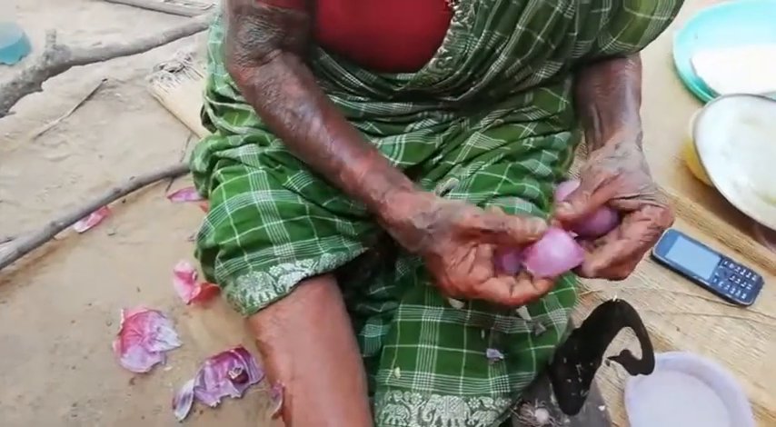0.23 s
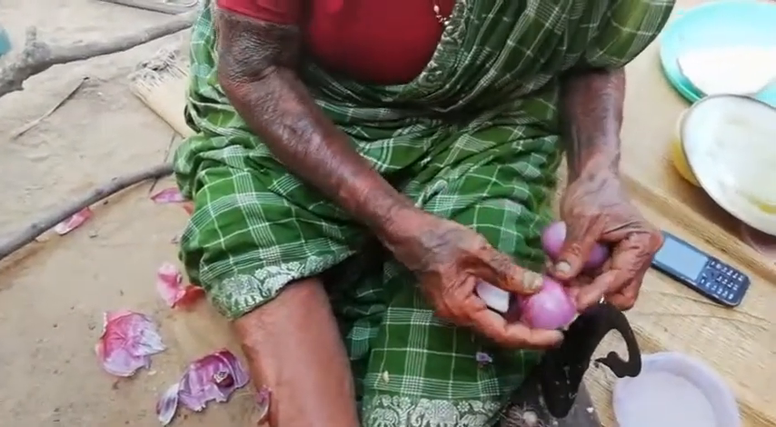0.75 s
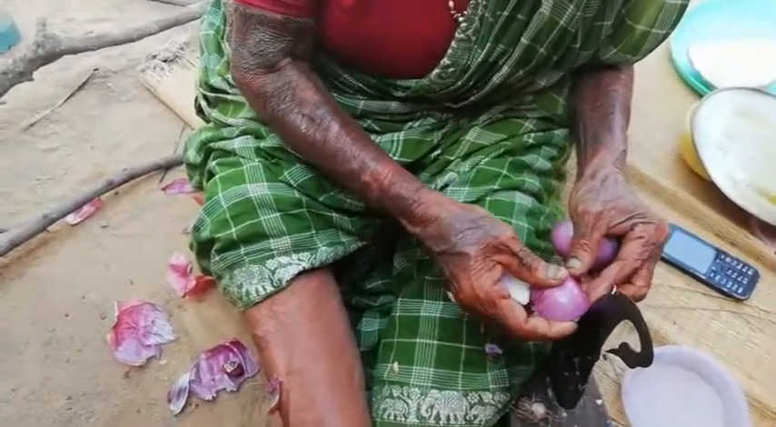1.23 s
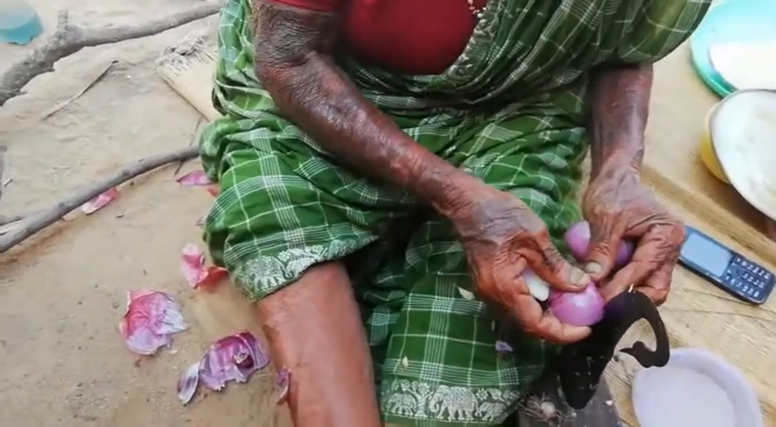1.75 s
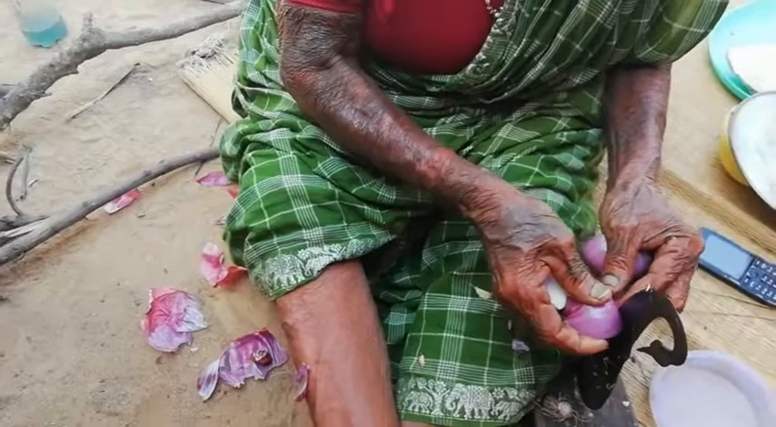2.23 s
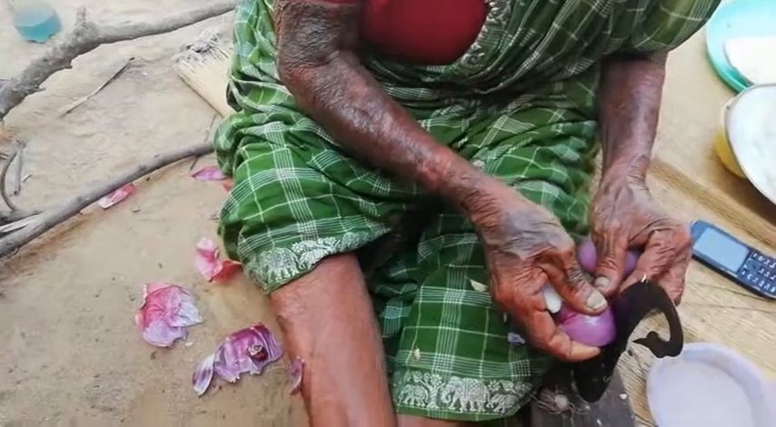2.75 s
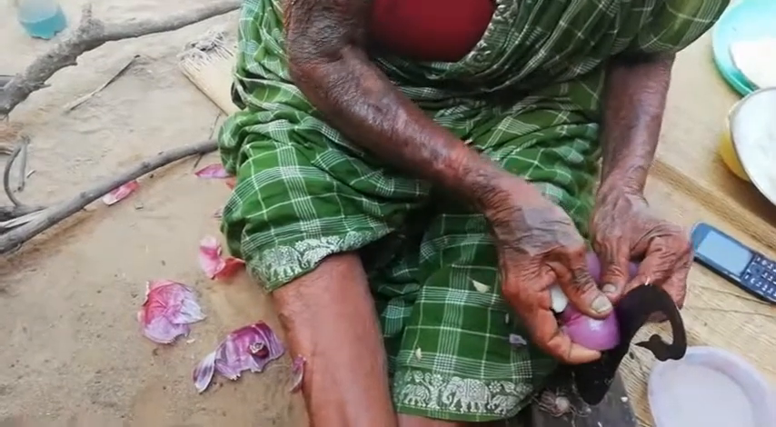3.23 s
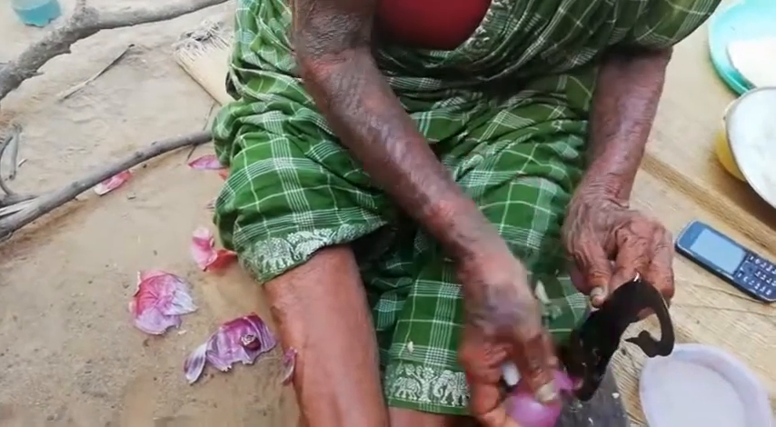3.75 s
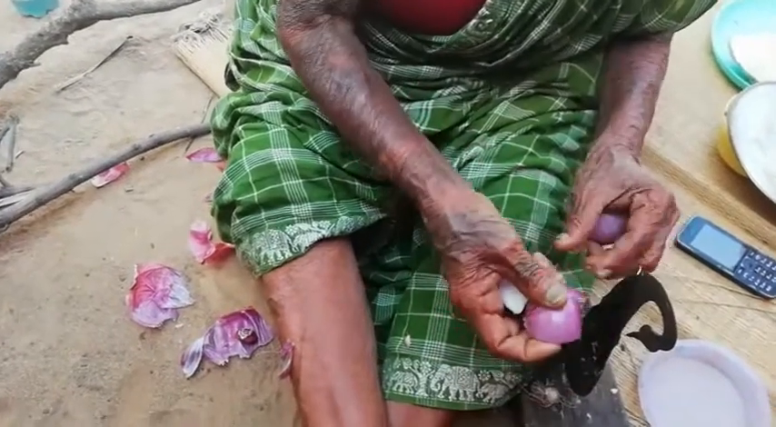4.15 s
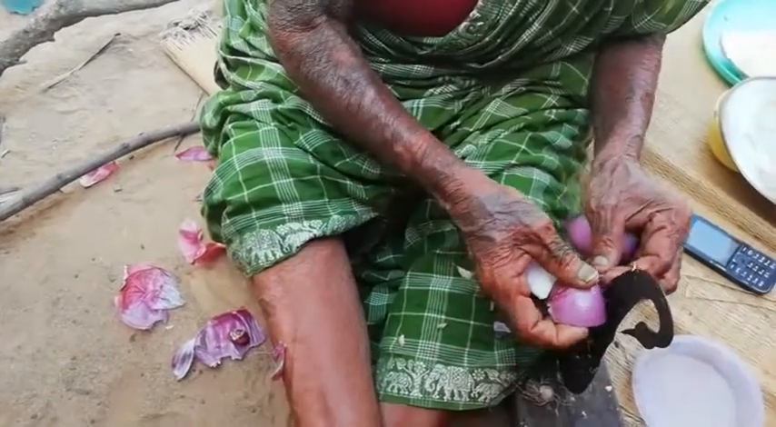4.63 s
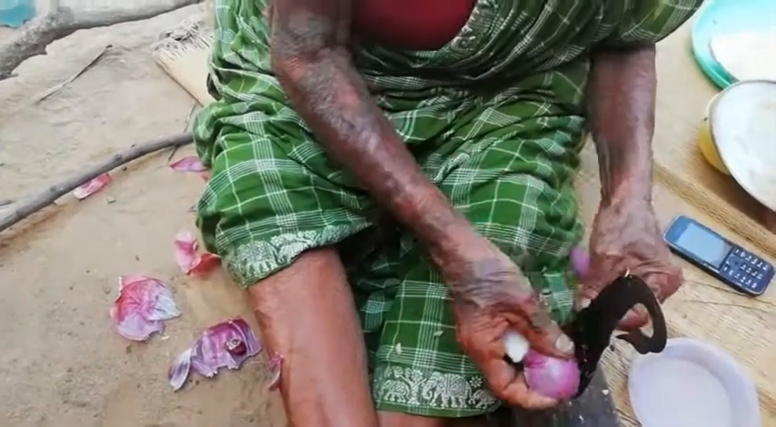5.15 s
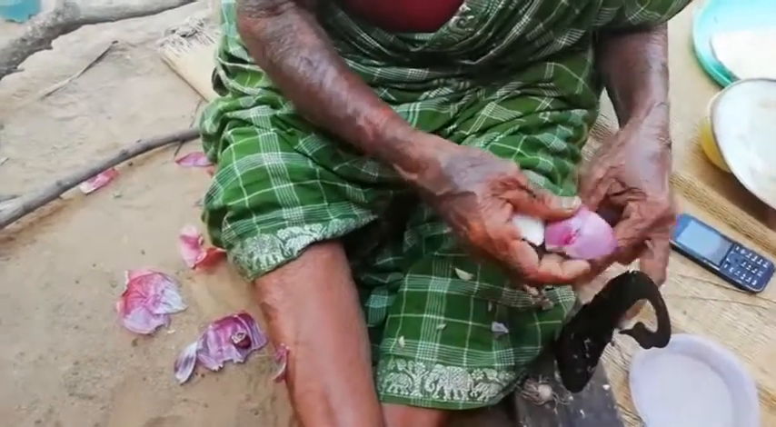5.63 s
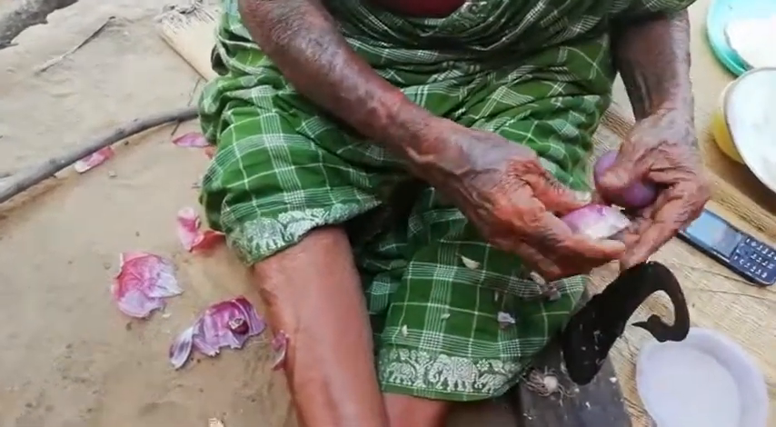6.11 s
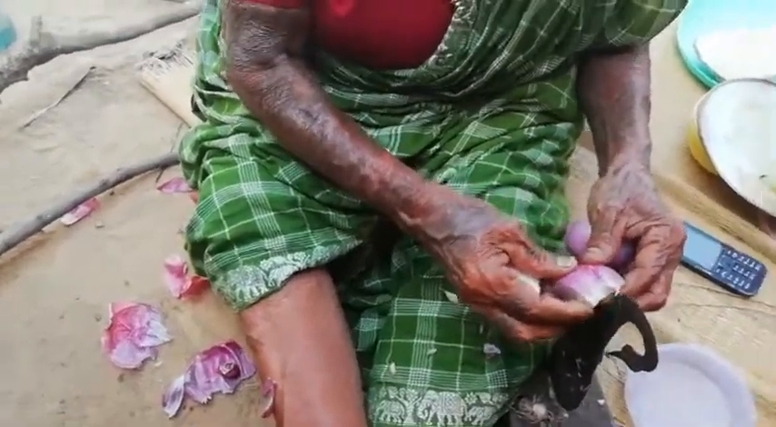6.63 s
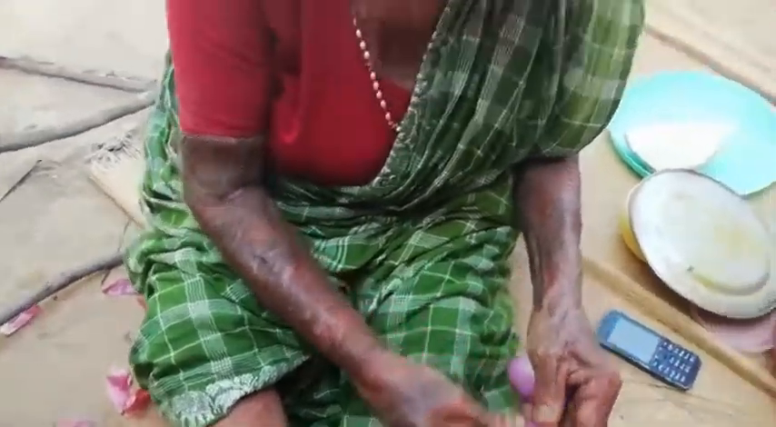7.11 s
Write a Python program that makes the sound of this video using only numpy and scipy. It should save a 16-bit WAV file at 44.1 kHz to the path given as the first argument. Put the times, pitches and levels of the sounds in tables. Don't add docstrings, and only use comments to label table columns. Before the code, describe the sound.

An open rural yard, with soft air hiss and a faint low engine throb from the start. At about 0.9 seconds a hen gives a long, nasal cry, strongest near 1.2, falling and fading by 1.7. A chick peeps thinly at 1.7 and 2.0, and small birds swoop downward around 2.0 to 2.4. Far whistles repeat between 2.4 and 3.8. The hen clucks at 2.5, murmurs, clucks more clearly at 3.3, then softly at 4.2, with a groan and coo near 4.7. More peeps come at 4.1, 4.5, 5.0 and faintly 6.3. Close by, dry onion skins rustle, with sharp snaps at 2.3, 3.4 to 3.5 and 5.6. Two dull handling bumps fall at 2.3 and 2.7. Leaves stir gently; another distant engine swells around 5. The loudest papery crackling and snapping comes from 7.0 to 7.3.

```python
import sys
import numpy as np
from scipy import signal
from scipy.fft import rfft, irfft
from scipy.io import wavfile
from scipy.ndimage import uniform_filter1d

SR = 44100
rng = np.random.default_rng(int(sys.argv[2]) if len(sys.argv) > 2 else 0)


def gain_from_decibels(decibels):
    exponent = np.asarray(decibels, float) / 20
    return 10 ** exponent


def pcm_store(signal):
    levels = np.round(np.clip(np.atleast_2d(signal), -1, 1) * 32767)
    wavfile.write(sys.argv[1], SR, levels.astype(np.int16).T)


N = 325017


def shape(points, hz):
    p = np.array(points)
    return gain_from_decibels(np.interp(np.log(hz + 1), np.log(p[:, 0] + 1), p[:, 1]))


def coloured(x, points):
    y = irfft(rfft(x) * shape(points, np.fft.rfftfreq(N, 1 / SR)), N)
    return y / np.std(y)


def band(x, order, hz, kind="low"):
    return signal.sosfilt(signal.butter(order, hz, kind, fs=SR, output="sos"), x)


def drift(rate):
    width = max(int(SR / 80 / rate), 1)
    slow = uniform_filter1d(uniform_filter1d(rng.standard_normal(N // 40), width), width)
    return np.interp(np.arange(N) / 40, np.arange(len(slow)), slow / np.std(slow))


def span(rows):
    s, *columns = np.transpose(rows)
    at = np.arange(round(s[0] * SR), min(round(s[-1] * SR), N))
    ends = np.clip(np.minimum(at - at[0], at[-1] - at) / (0.0035 * SR), 0, 1)
    return at, ends, [np.interp(at / SR, s, c) for c in columns]


def tones(tables, overtones, flutter_db, flutter_rate, colour=((1, 0), (20000, 0))):
    out = np.zeros(N)
    for k, k_db in overtones:
        flutter = gain_from_decibels(flutter_db * drift(flutter_rate))
        start = rng.uniform(0, 2 * np.pi)
        for rows in tables:
            at, ends, (pitch, level_db) = span(rows)
            phase = 2 * np.pi * k * np.cumsum(pitch) / SR
            gain = gain_from_decibels(level_db + k_db) * shape(colour, k * pitch) * flutter[at]
            out[at] += np.sqrt(2) * ends * gain * np.sin(phase + start)
    return out


def throat(modes, hz):
    return sum(gain_from_decibels(level_db) / (1 + (2 * (hz - centre_hz) / width_hz) ** 2)
               for centre_hz, width_hz, level_db in modes)


def voice(pitch, rough, gain_at):
    n = len(pitch)
    phase = 2 * np.pi * np.cumsum(pitch * (1 + 0.043 * rough * drift(150)[:n])) / SR
    orders = np.arange(1, 30)[:, None]
    wander = drift(9)[(np.arange(n) + 9973 * orders) % N]
    gains = gain_at(orders * pitch) * gain_from_decibels(4.5 * wander * np.minimum(orders / 8, 1))
    shimmer = np.array([drift(120)[:n] for _ in range(3)])[orders[:, 0] % 3]
    rough = np.minimum(rough * (1 + (orders / 11) ** 2), np.maximum(rough, .45))
    breakup = 1 - rough + 2.6 * rough * shimmer
    lines = gains * breakup * np.sin(orders * phase + orders ** 2 * 0.223)
    return lines.sum(0) / np.sqrt(.5 * np.sum(gains ** 2, 0))


# start_s, pitch_hz, level_db, beak opening [0-1], main resonance [share of rest]
CALL = [
    (.92, 495, -57, 0.44, 0.93),
    (.965, 413.4, -47, 0.54, 0.94),
    (1.06, 440.7, -32.5, 1, 0.83),
    (1.14, 429, -34.5, 1, 0.92),
    (1.185, 404.7, -28.5, 0.98, 1.15),
    (1.3, 363, -32, 0.7, 1.01),
    (1.37, 352, -40.5, 0.51, 0.926),
    (1.445, 360, -44.5, 0.26, 0.71),
    (1.72, 304, -63.5, 0.33, 0.68),
]
# centre_hz, width_hz, level_db
OPEN_THROAT = [(850, 160, -7), (1500, 310, 2.5), (2560, 1050, -7.5), (3240, 210, -1), (4960, 920, -9),
               (6300, 1600, -14), (8200, 610, -52)]
# centre_hz, width_hz, level_db
CLOSED_THROAT = [(706, 690, -6), (1020, 63, -13), (1880, 660, -43)]


def long_call():
    out = np.zeros(N)
    at, ends, (pitch, level_db, beak, slide) = span(CALL)
    settle_s = .03
    since_s = (at - at[0]) / SR
    rough = .04 + .3 * np.exp(-((since_s - 2 * settle_s) / settle_s) ** 2 / 2)
    beak = np.clip(beak, 0, 1) ** 2
    low, (main_hz, *main), *high = OPEN_THROAT

    def mouth(hz):
        opened = throat([low, (main_hz * slide, *main)], hz) + beak * throat(high, hz)
        closed = 0.19 * (1 - beak) ** 2 * throat(CLOSED_THROAT, hz)
        chest_cut_hz = 437
        return (beak * opened + closed) / (1 + (chest_cut_hz / hz) ** 6)

    out[at] += ends * gain_from_decibels(level_db) * voice(pitch, rough, mouth)
    return out


def cluck(row, moves):
    s, length, pitch_hz, throat_hz, level_db = row
    start, soon, end, sag, width_hz, rough_share = moves
    attack_s = .014
    opened = min(.03, 0.91 * length)
    at, ends, (pitch, fall_db, opens) = span([(s - attack_s / 2, pitch_hz, -8, start),
                                              (s + attack_s, 1.02 * pitch_hz, 3, start),
                                              (s + attack_s + opened, pitch_hz, -1, soon),
                                              (s + length + attack_s, sag * pitch_hz, -7, end)])
    modes = [(throat_hz * opens, width_hz, 0), (2.09 * throat_hz, 500, -16), (3000, 900, -24)]
    rough = np.clip(rough_share * .036 * (-30 - level_db), 0, 1)
    return at, ends * gain_from_decibels(level_db + fall_db) * voice(pitch, rough, lambda hz: throat(modes, hz))


# start_s, length_s, pitch_hz, throat_hz, level_db
CLUCKS = [
    (2.526, 0.075, 252.5, 1060, -53),
    (3.282, 0.11, 253, 990, -41),
    (4.187, 0.12, 229.2, 850, -57.5),
    (5.064, 0.058, 268.4, 1450, -63),
    (5.336, 0.054, 239.5, 865, -72.5),
    (6.749, 0.033, 247, 900, -72.5),
    (1.663, 0.12, 262, 1420, -65),
]
# start_s, length_s, pitch_hz, throat_hz, level_db
GROANS = [
    (2.66, 0.13, 261.4, 1046, -50.5),
    (2.81, 0.047, 245, 764, -57),
    (4.68, 0.17, 259, 962, -54.5),
    (4.89, 0.1, 247, 1000, -64.5),
    (5.822, 0.062, 258.8, 810, -64.5),
    (6.055, 0.12, 249.3, 990, -62),
]
CLUCK_MOVES = (.74, 1., 1.0, .97, 300, .7)
GROAN_MOVES = (1., 1., .9, .92, 170, .6)
# start_s, pitch_hz, level_db
COO = [
    (4.59, 274, -65),
    (4.64, 274, -55),
    (4.7, 254.6, -52),
    (4.76, 264, -63),
]


def hen():
    out = tones([COO], [(1, 0.019)], 2.0, 30) + long_call()
    for rows, moves in ((CLUCKS, CLUCK_MOVES), (GROANS, GROAN_MOVES)):
        for row in rows:
            at, sound = cluck(row, moves)
            out[at] += sound
    return out


def peep(row, form):
    s, crest_hz, end_hz, length, level_db = row
    start_hz, lead, lead_db, drop, roundness = form
    t = np.linspace(-lead, length, num=60)
    early = np.clip(-t / lead, 0, 1)
    late = np.clip(t / min(drop, length), 0, 1)
    climb_hz = (crest_hz - start_hz) * early ** 2
    slide_hz = (crest_hz - end_hz) * (1 - (1 - late ** roundness) ** 2)
    fade_db = -5 * late ** 3 - 44 * np.clip(t - drop, 0, None)
    return np.c_[s + t, crest_hz - climb_hz - slide_hz, level_db + lead_db * early ** .4 + fade_db]


# hz, level_db
BEAK = [(1800, -7), (2550, -2.5), (3200, -1.5), (4800, -14.5), (5800, 1), (6800, 4.5), (7600, 3),
        (9000, -11)]
# crest_s, crest_hz, end_hz, length after crest_s, level_db
PEEPS = [
    (1.665, 3402, 2482, 0.12, -51.5),
    (2.033, 3270, 2513, 0.15, -53.5),
    (4.075, 3656, 2505, 0.15, -54.5),
    (4.496, 3367, 2550, 0.15, -55.5),
    (5.026, 3516, 1783, 0.062, -57),
    (6.331, 3630, 2100, 0.072, -63),
]
# start_hz, climb_s, start level_db, slide_s, crest roundness [exponent]
PEEP_SHAPES = [(3290, 0.033, -8.5, 0.077, 2.4), (3370, 0.046, -17, .065, 1.4), (3270, .045, -13, .078, 1.5),
               (3370, .04, -13, .075, 1.6), (3250, .045, 2.5, .045, 1.3), (3250, .057, -4.5, .062, 1.9)]
# multiple, level_db
PEEP_OVERTONES = [(1, 9.5), (2, -2), (3, -14)]


def chick():
    curves = [peep(row, form) for row, form in zip(PEEPS, PEEP_SHAPES)]
    return gain_from_decibels(9.0) * tones(curves, PEEP_OVERTONES, 4.5, 110, BEAK)


def whistle(s, length, hz, level_db, scoop_s):
    t = np.linspace(0, length, num=40)
    swell_db = -12 * np.clip(1 - t / .014, 0, 1) - 8 * t
    return np.c_[s + t, hz * (1 - .14 * np.exp(-t / scoop_s)), level_db + swell_db]


# start_s, length_s, held pitch_hz, level_db, scoop_s
WHISTLES = [
    (2.44, 0.16, 1530, -59.5, 0.039),
    (2.8, 0.212, 1535, -62, .045),
    (3.225, 0.154, 1508, -56.5, 0.056),
    (3.62, 0.17, 1505, -60.5, .06),
    (1.4, .09, 1300, -73, 0.00421),
]
# multiple, level_db
WHISTLE_OVERTONES = [(1, 0), (2, 2.5), (3, 6.5), (4, 7)]


def whistling_bird():
    return gain_from_decibels(2.5) * tones([whistle(*row) for row in WHISTLES], WHISTLE_OVERTONES, 3.5, 21)


def swoop(s, length, start_hz, end_hz, level_db):
    u = np.linspace(0, 1, num=40)
    pitch = end_hz + (start_hz - end_hz) * (1 - u) ** 2.2
    return np.c_[s + length * u, pitch, level_db + np.interp(u, [0, 0.24, 1], [-10, 0, -10])]


# start_s, length_s, start_hz, end_hz, level_db
SWOOPS = [
    (1.983, 0.046, 4500, 2700, -49.5),
    (4.17, 0.18, 5300, 4620, -57.5),
    (2.287, 0.087, 4800, 2600, -50),
    (2.037, 0.0403, 2650, 2000, -60),
    (2.36, 0.061, 2600, 2200, -62.5),
]


def swooping_bird():
    return gain_from_decibels(16.5) * tones([swoop(*row) for row in SWOOPS], [(1, 3.0), (2, -25)], 4.5, 40, BEAK)


def twitter(s, length, hz, level_db, rise):
    u = np.linspace(-1, 1, num=20)
    arch = 0.07 * min(.06 / length, 1) * u ** 2
    return np.c_[s + length * (u + 1) / 2, hz * (1 + rise * u - arch), level_db - 5 * u ** 2]


# start_s, length_s, pitch_hz, level_db,
# rise [share of pitch]
TWITTER = [(0.0, 0.38, 2947, -86.5, 0.0028), (0.711, 0.078, 3180, -87.5, 0.02),
           (0.863, 0.066, 3370, -81.5, .01), (1.907, 0.02, 2310, -73, -0.011),
           (4.228, 0.03, 3370, -67, 0.056), (4.253, 0.026, 3550, -65, -0.1),
           (4.28, 0.025, 3650, -73, -0.015), (4.306, 0.022, 3420, -70, -0.083),
           (4.994, 0.0476, 6980, -62, -0.0091), (4.83, 0.072, 4400, -73, -0.0038),
           (5.25, 0.056, 4930, -83, .03), (5.36, 0.058, 4800, -78, 0.01), (5.505, 0.032, 4700, -80, .01),
           (5.584, 0.037, 2836, -71.5, 0.019), (5.684, 0.044, 2780, -73.5, 0.071),
           (5.811, 0.0296, 2530, -72.5, 0.133), (5.849, 0.066, 2950, -82.5, .01),
           (3.8, 0.056, 2720, -78, -.02), (3.859, .075, 2666, -78.5, .01), (4.942, 0.028, 4300, -71, .01),
           (5.69, 0.078, 4370, -81, 0.0066), (5.101, 0.043, 3000, -76.5, -0.071),
           (5.178, .025, 2950, -81, 0.014)]


def twittering_birds():
    return gain_from_decibels(22.0) * tones([twitter(*row) for row in TWITTER], [(1, 0)], 4.6, 70)


# crest_s, treble level_db, swell_s, ebb_s (20 dB times), body over treble_db
RUSTLE = [(1.22, -58.5, 0.15, 0.11, 12.5), (1.48, -56, 0.082, 0.026, 5.5), (1.76, -60, 0.079, 0.11, -18),
          (1.87, -52, 0.19, 0.075, -2.5), (2.21, -61, 0.25, .1, -4), (2.275, -46.5, 0.091, 0.062, -1.5),
          (2.64, -53.5, 0.22, 0.052, -0.5), (2.95, -52, 0.079, 0.19, -29), (3.092, -45, 0.062, 0.12, -5.5),
          (3.17, -45.5, 0.069, 0.02, -15), (3.37, -49.5, 0.071, 0.12, 0.5), (3.47, -52.5, 0.2, 0.14, 0.5),
          (3.67, -54, 0.035, 0.024, -4), (3.8, -67, 0.22, 0.04, 13), (3.98, -63, .03, 0.024, 0),
          (4.12, -78, 0.81, 0.99, 15), (4.939, -49.5, 0.097, 0.049, -1.5), (5.629, -67, 0.043, 0.16, 10),
          (6.219, -69.5, 0.24, 0.018, 6.5), (6.73, -56, 0.14, 0.13, -5), (6.835, -50.5, 0.045, 0.17, -8),
          (7.095, -35.5, 0.092, 0.059, -3.5), (7.26, -39.5, 0.027, 0.02, 1),
          (7.05, -43.5, 0.015, 0.031, 0.5), (7.218, -53, 0.0055, 0.066, -6), (7.31, -62, 0.072, 0.03, 8),
          (2.197, -61.5, 0.0089, .08, 9.5), (3.045, -44.5, 0.014, .06, -6.5),
          (6.828, -53.5, 0.017, 0.023, -1.5)]
# hz, density_db
SKIN = [(530, -25.5), (1100, -20.5), (1490, -1.5), (1800, -9), (2250, -8.5), (2700, -10.5), (3900, -5.5),
        (4980, -0.5), (6110, 1.5), (7250, -5), (7960, -18.5), (12900, -7.5), (14900, -17.5), (16000, -11)]


def skins():
    t = np.arange(0, N, 40) / SR
    bright = np.full(len(t), gain_from_decibels(-85))
    full = np.full(len(t), gain_from_decibels(-85 + 11.5))
    for s, treble_db, swell, ebb, body_db in RUSTLE:
        away = np.abs(t - s) / np.where(t < s, swell, ebb)
        stroke = gain_from_decibels(treble_db - 20 * away ** 1.77)
        bright = np.hypot(bright, stroke)
        full = np.hypot(full, gain_from_decibels(body_db) * stroke)
    sizes = gain_from_decibels(2.15 * np.minimum(rng.exponential(1, N), 3.6)) * rng.choice([-1, 1], N)
    crackle = sizes * (rng.random(N) < 1200 * gain_from_decibels(3.5 * drift(25)) / SR)
    rub = coloured(crackle / np.std(crackle) + 0.32 * rng.standard_normal(N), SKIN)
    treble = band(rub, 4, 8500, "high")
    body = band(rub, 4, 8500)
    now = np.arange(N) / SR
    return (np.interp(now, t, bright) * treble + np.interp(now, t, full) * body) / np.std(treble)


def ring(hz, t60, length=.06):
    t = np.arange(int(length * SR)) / SR
    return np.sin(2 * np.pi * hz * t) * gain_from_decibels(-60 * t / t60)


def burst(hz):
    t = np.arange(int(.06 * SR)) / SR
    rise_s, ring_s = .0003, .003
    return np.sin(2 * np.pi * hz * t) * (1 - np.exp(-(t / rise_s) ** 2)) * gain_from_decibels(-60 * (t / ring_s) ** 1.57)


# start_s, peak level_db, ring_hz, treble share_db
SNAPS = [(1.828, -43, 4600, -11), (1.929, -45, 4830, -10), (2.192, -40.5, 6550, -25),
         (2.2743, -30.5, 6600, -8.0), (2.3183, -55, 3170, 0), (2.681, -44, 2160, -9),
         (3.0739, -33.5, 6300, -10), (3.3817, -26, 6060, -13), (3.442, -34, 5700, -2),
         (3.4404, -31, 6130, -8), (3.4599, -19, 5940, -10), (3.41, -40, 6500, -4), (3.4375, -40, 6000, -12),
         (3.431, -42, 3330, -10.5), (3.868, -43, 1840, -21), (3.981, -37, 5350, -12.5),
         (4.718, -41, 6100, -23), (4.8956, -39, 5750, -10), (4.951, -40, 4400, -9),
         (5.6261, -21, 5700, -15.5), (6.05, -57, 6290, -2), (6.215, -38, 5400, -6),
         (6.693, -46.5, 5160, -1), (7.045, -35, 6300, -5), (7.094, -24.5, 6550, -15),
         (7.103, -21.5, 5080, -12), (7.248, -36, 5200, -3), (7.062, -32, 6070, -10), (7.08, -32, 6130, -2),
         (7.1047, -20, 6100, -14), (7.2153, -47, 5720, -3), (7.2534, -36, 5600, -11),
         (7.27, -27, 6700, -5.5), (7.279, -40, 5600, 6), (6.9993, -55, 5410, -4), (3.157, -33, 6680, -8),
         (3.182, -37.5, 6300, -19), (7.2588, -31, 6500, -17)]


def skin_snaps():
    out = np.zeros(N + SR)
    lucks = rng.normal(0, 2.5, (len(SNAPS), 4))
    for (s, peak_db, hz, crack_db), luck in zip(SNAPS, lucks):
        shell = sum(gain_from_decibels(g - 27.5) * ring(mode_hz, 0.027)
                    for g, mode_hz in zip(luck, (3235, 4900, 6600, 6930)))
        crack = gain_from_decibels(crack_db - 8) * (ring(9630, 0.0035) + burst(12600))
        hit = burst(hz) + gain_from_decibels(-21.5) * burst(2970) + gain_from_decibels(-16.0) * burst(7800) + shell + crack
        out[round(s * SR):][:len(hit)] += gain_from_decibels(peak_db) * hit / np.abs(hit).max()
    return band(out[:N], 2, 2100, "high")


# start_s, peak level_db, pitch_hz
BUMPS = [
    (2.27, -34, 53),
    (2.733, -36.5, 69.6),
]


def housing_bumps():
    out = np.zeros(N + SR)
    for s, peak_db, hz in BUMPS:
        thud = ring(hz, 0.057, length=.15)
        out[round(s * SR):][:len(thud)] += gain_from_decibels(peak_db) * thud
    return out[:N]


# start_s, firing_hz, level_db
PUMP = [
    (0.0, 30.52, -45.5),
    (.9, 30.36, -40),
    (2.4, 29.12, -55),
    (2.96, 29.12, -58.5),
    (3.45, 28.69, -47.5),
    (3.9, 28.64, -57),
    (4.5, 28.94, -62.5),
]
# multiple, level_db
PUMP_ORDERS = [(2, -9), (3, -33), (4, -12), (5, -3), (6, 0.5), (7, -10.5), (8, -17)]
# start_s, firing_hz, level_db
TRACTOR = [
    (4.2, 20, -63),
    (4.68, 21.8, -44),
    (5.3, 21.5, -42),
    (5.69, 23, -50),
    (6.2, 22.5, -54.5),
    (6.57, 23.6, -56.5),
    (7.37, 24.7, -72),
]
# multiple, level_db
TRACTOR_ORDERS = [(2, -6.5), (5, -1), (6, 2.5), (7, -1.5), (9, -13.5), (12, -12.5), (13, -16)]


def distant_engines():
    pump = gain_from_decibels(-6.5) * tones([PUMP], PUMP_ORDERS, 3.5, 8.7)
    return pump + gain_from_decibels(-8.0) * tones([TRACTOR], TRACTOR_ORDERS, 2.56, 17.0)


# start_s, level_db
YARD = [
    (0.0, -97),
    (0.55, -88),
    (1.0, -73),
    (1.82, -58.5),
    (2.6, -60),
    (3.26, -55.5),
    (3.82, -60),
    (4.1, -54),
    (6.65, -62),
    (7.37, -62),
]
# hz, density_db
LEAVES = [(1500, -11.5), (2200, -13), (3000, -3.5), (3900, -6), (5000, -2.5), (6500, 0.5), (7400, -6),
          (7800, -20.5)]


def far_leaves():
    at, _, (level_db,) = span(YARD)
    out = np.zeros(N)
    noise = coloured(rng.standard_normal(N), LEAVES)
    out[at] = gain_from_decibels(level_db + 3.5 * drift(42)[at]) * noise[at]
    return out


# hz, density_db
AIR = [(12, -55), (20, -2), (81, -4.5), (154, -1.5), (574, -24.5), (1190, -18.5), (2390, -23.5),
       (2990, -20.5), (3740, -25), (4940, -18), (6180, -19.5), (7110, -24.5), (7950, -33.5), (14700, -35.5),
       (16000, -39)]
# start_s, level_db
VILLAGE = [
    (0.0, -64.5),
    (.6, -67),
    (1.8, -67),
    (2.3, -73.5),
    (3.5, -66),
    (4.5, -65),
    (5.4, -69),
    (7.37, -69.5),
]


def open_air():
    one, left, right = rng.standard_normal((3, N))
    alike = 0.026
    rumble = band(one, 2, 280)
    mixed = np.sqrt(alike) * one + np.sqrt(1 - alike) * np.array([left, right])
    own = band(mixed, 2, 280, "high")
    level = gain_from_decibels(-52 + 1.2 * drift(1.0))
    hiss = np.array([coloured(rumble + side, AIR) for side in own]) * level
    at, _, (murmur_db,) = span(VILLAGE)
    murmur = signal.sosfiltfilt(signal.butter(1, [230, 1500], "band", fs=SR, output="sos"), hiss)
    hiss[:, at] += murmur[:, at] * (gain_from_decibels(murmur_db - murmur_db.mean()) - 1)
    return hiss


def yard(x, t60, wet_db, first_s=.006, density=.03):
    t = np.arange(int(.4 * SR)) / SR
    scatter = rng.standard_normal((2, len(t))) * (rng.random((2, len(t))) < density)
    scatter *= gain_from_decibels(-60 * t / t60) * (t > first_s)
    scatter /= np.sqrt(np.sum(scatter ** 2, 1, keepdims=True))
    return x + gain_from_decibels(wet_db) * signal.fftconvolve(x[None], scatter, axes=1)[:, :N]


# hz, left minus right level_db
LEFT_SHADE = [(430, 0.5), (850, -9.5), (1100, -2.5), (3300, -2.5), (4100, -7.5), (4800, -10), (6500, -2),
              (15000, -5.5)]
# hz, phase [radians]
LEFT_TURN = [(250, 0), (430, -0.03), (800, 0.86), (1200, -0.5), (1850, -1.8), (2600, -5.5), (3200, -5),
             (6000, -5)]


def ports(x, lag_s, tilt_db):
    hz = np.fft.rfftfreq(N, 1 / SR)
    shared = 1 / (1 + (hz / 330) ** 4)
    turn_hz, turn_rad = np.transpose(LEFT_TURN)
    turn = np.interp(np.log(hz + 1), np.log(turn_hz), turn_rad)
    gain = shared + (1 - shared) * shape(LEFT_SHADE, hz) * gain_from_decibels(tilt_db * hz / 10000)
    left = irfft(rfft(x[0]) * gain * np.exp(-2j * np.pi * hz * lag_s - 1j * turn), N)
    return np.array([left, x[1]])


def scene():
    birds = chick() + swooping_bird() + twittering_birds() + whistling_bird()
    far = yard(gain_from_decibels(6.5) * hen(), 0.11, -13)
    far += yard(birds, .15, -2, first_s=.002)
    far += yard(far_leaves(), 0.19, 0.0088)
    snaps = skin_snaps()
    near = yard(gain_from_decibels(3.0) * skins(), 0.046, -0.091)
    near += yard(gain_from_decibels(11.5) * snaps, 0.0057, -0.85, first_s=0.00044, density=.4)
    near += yard(snaps, 0.056, 1.1)
    distant = ports(far + open_air() + distant_engines(), 26 / SR, 0.11)
    return distant + ports(near, 16 / SR, -9.0) + housing_bumps()


def low_pass(x):
    return signal.sosfilt(signal.butter(12, 16490, fs=SR, output="sos"), x)


def record(dry):
    mix = signal.sosfilt(signal.cheby2(12, 60, 16300, fs=SR, output="sos"), dry)
    return low_pass(mix)


dry = scene()
out = record(dry)
pcm_store(out)
```